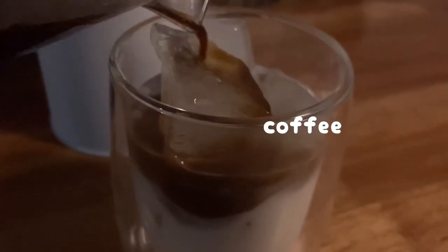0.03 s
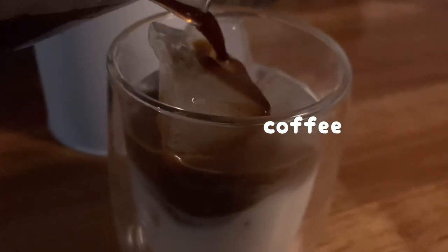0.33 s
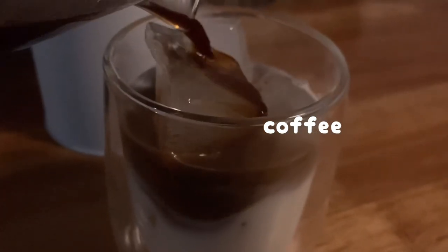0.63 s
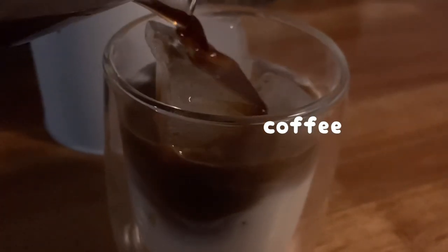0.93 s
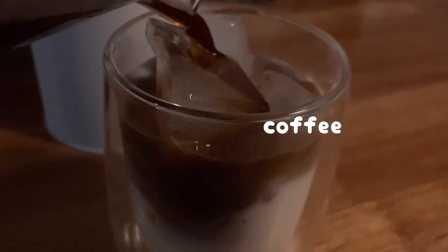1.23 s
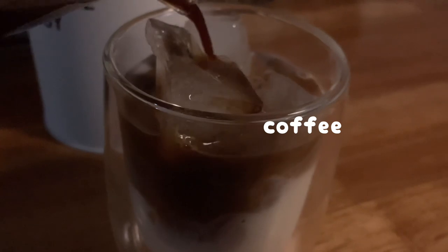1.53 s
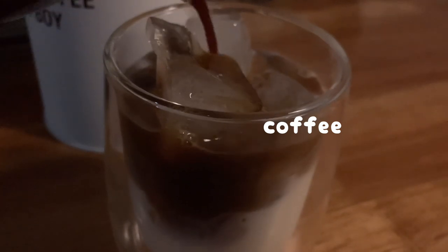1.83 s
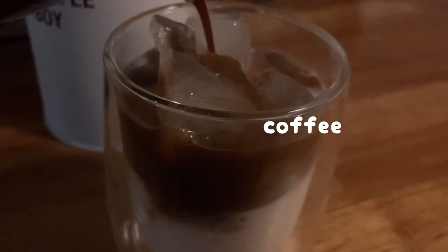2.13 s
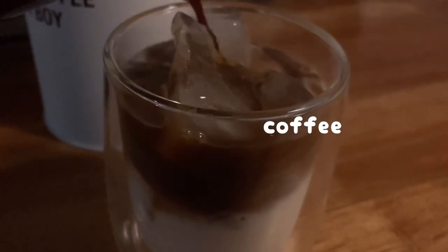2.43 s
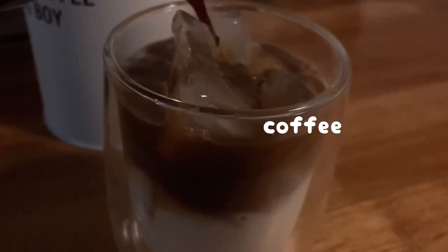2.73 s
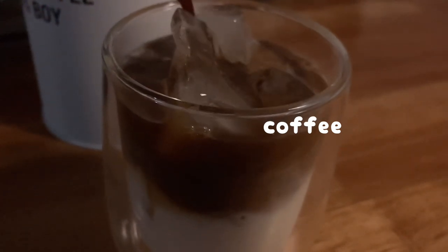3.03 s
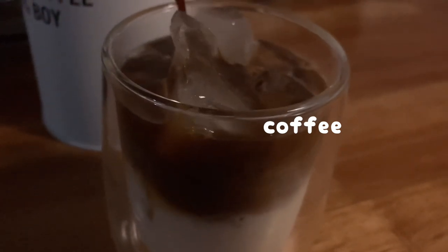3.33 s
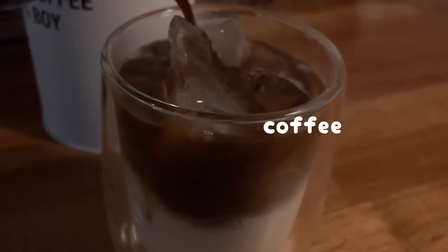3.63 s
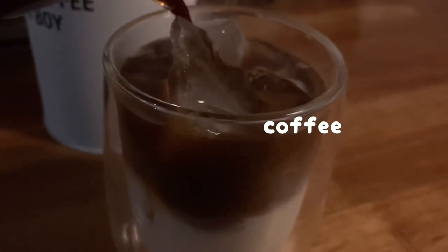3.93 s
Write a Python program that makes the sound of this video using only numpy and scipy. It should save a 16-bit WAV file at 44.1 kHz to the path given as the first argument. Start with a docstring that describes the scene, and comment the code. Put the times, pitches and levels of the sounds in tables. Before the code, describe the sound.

Ice cubes crackle softly and knock against a glass under a faint trickle of coffee.

```python
"""Ice ticks and crackles in a glass as a thin stream of coffee trickles over it, close to a stereo mic.
The warmed ice cracks and rings the glass; small bubbles burst as short rising pings.
Now and then a cube slips, knocks the glass and grinds on; once the big cube settles with a low ring.
Behind it an appliance hums in a small, quiet room."""
import sys
import numpy as np
from scipy import signal
from scipy.fft import rfft, irfft, next_fast_len
from scipy.io import wavfile
from scipy.ndimage import map_coordinates

SR = 44100
rng = np.random.default_rng(int(sys.argv[2]) if len(sys.argv) > 2 else 0)


def transcribe(u):
    """Save the signal u as a 16-bit wav file named by the first command-line argument.

    u: samples, shape (n,) or (channels, n), limited to [-1, 1]; the rate is SR.
    q: integer samples, one column per channel.
    """
    v = np.clip(np.atleast_2d(u).T, -1, 1)
    q = np.round(v * 32767).astype(np.int16)
    wavfile.write(sys.argv[1], SR, q)


N = 176400
TOP_HZ, LEAD_S, GRAIN_SCATTER_DB = 16350, .002, 3.5

# Cracks in the ice. Each row: start in seconds, relative level in dB, centre in Hz, width in octaves.
ICE_CRACKS = [(0.0171, -68.5, 4340, 0.96), (0.0635, -67.5, 6610.0, 0.075), (0.2368, -69, 10040.0, 0.14),
              (0.2555, -67, 7200, 0.32), (.39, -68.5, 9850, 0.69), (0.4967, -61.5, 6800, 0.11),
              (0.5041, -66.5, 7550, 0.24), (0.6202, -65.5, 7100, 0.27), (0.6827, -67, 4830.0, 1),
              (0.7194, -68, 7360, 0.21), (0.7641, -57, 6170, 0.41), (0.7934, -67, 4200, 0.41),
              (0.8515, -64, 4450.0, 0.58), (0.8844, -62, 4700.0, 0.44), (0.8914, -54, 11190.0, 0.69),
              (0.9194, -62, 10900, 0.17), (0.9526, -61, 8900.0, 0.97), (1.0421, -53, 9270, 0.16),
              (1.0614, -64, 11210.0, 0.22), (1.0745, -63, 9600, 0.34), (1.099, -66, 9690.0, 0.31),
              (1.1181, -67, 10950.0, 0.16), (1.2271, -59.5, 9400, 0.2), (1.2376, -71, 13390.0, 0.21),
              (1.2447, -70, 14000, 0.1), (1.2767, -70, 13470.0, 0.11), (1.322, -75, 7000, 0.28),
              (1.3399, -73, 15000, 0.14), (1.3697, -73, 11840.0, 0.44), (1.5669, -68, 7060.0, 0.59),
              (1.581, -71, 7880.0, 0.28), (1.5965, -70, 7880.0, 0.11), (1.6787, -68, 8450.0, 0.26),
              (1.7057, -72, 9810.0, 0.36), (1.7144, -65, 8200, 0.18), (1.7264, -65, 10000, 0.21),
              (1.7477, -56, 9400, 0.2), (1.7583, -67, 9500, 0.17), (1.7821, -62, 11100, 0.18),
              (1.802, -77, 11500, .2), (1.8576, -70, 11390.0, 0.25), (1.9025, -53.5, 11960.0, 0.31),
              (2.0014, -62, 11500, 0.32), (2.109, -76, 8000, 0.13), (2.1209, -71, 8230.0, 0.15),
              (2.1435, -68, 9400, 0.26), (2.263, -67, 5980.0, 0.65), (2.2694, -61.5, 8300, 0.23),
              (2.2873, -70, 8320.0, 0.41), (2.4921, -53.5, 7740, 0.15), (2.5283, -61.5, 7400, 0.2),
              (2.5565, -67, 8730.0, 0.15), (2.5634, -63, 7870.0, 0.11), (2.6919, -63, 10800, 0.22),
              (2.7214, -65.5, 8900, 0.45), (2.8946, -60, 9810.0, 0.062), (2.98, -66, 10200.0, 0.29),
              (3.0209, -62, 11280.0, 0.14), (3.034, -70, 11000, .15), (3.062, -65, 11140.0, 0.17),
              (3.0714, -68, 11260.0, 0.083), (3.0765, -59, 12000, 0.2), (3.155, -68, 9600, .35),
              (3.1896, -60, 11000, 0.21), (3.2, -71, 10900, .15), (3.257, -67, 7700, 0.18),
              (3.2772, -61.5, 9400, 0.48), (3.4794, -56, 11300, 0.36), (3.4929, -71, 10000, 0.16),
              (3.631, -69, 6500, 0.45), (3.724, -86, 13500, .2), (3.7693, -67, 6700, 0.23),
              (3.8835, -61.5, 8950, 0.53), (3.9417, -36.5, 15500, 0.51)]
# Cubes hitting the glass. Each row: start in seconds, relative level in dB, centre in Hz, width in octaves.
CUBE_KNOCKS = [(1.5158, -40.5, 4240, 2.7), (2.1944, -37.5, 1660, .36), (2.1946, -40, 4600, 0.75),
               (2.1972, -42, 3400, 0.93), (2.2016, -44.5, 3800, 1.1), (3.344, -45.5, 1880, 0.69),
               (3.371, -60.5, 4400, .74)]
# Left-right likeness of the ice sounds. Each row: frequency in Hz, coherence.
ICE_COHERENCE = [(1000, .88), (5500, .6), (7000, .99), (16000, .98)]


def amp(db):
    """Decibels to gain."""
    return 10 ** (np.asarray(db) / 20)


def unit_rms(x):
    """Scale to rms 1."""
    return x / np.sqrt(np.mean(x ** 2) + 1e-30)


def burst(x, db, window_s=.002):
    """Scale a short sound to the energy of db held for window_s."""
    return x / (np.linalg.norm(x) + 1e-20) * amp(db) * np.sqrt(window_s * SR)


def along(points, hz):
    """Interpolate (Hz, value) points on a log axis."""
    knots_hz, values = np.transpose(points)
    return np.interp(np.log(hz + 1), np.log(knots_hz + 1), values)


def envelope(points):
    """(s, dB) points to a gain per sample."""
    return amp(np.interp(np.arange(N) / SR, *np.transpose(points)))


def wobble(knots_per_s):
    """Smooth random curve."""
    return map_coordinates(rng.standard_normal(256), [np.arange(N) * knots_per_s / SR], mode="wrap")


def clock(samples):
    """Seconds since a contact, zero during the lead-in."""
    return np.maximum(np.arange(samples) / SR - LEAD_S, 0)


def filtered(x, response):
    """Apply the frequency response response(hz)."""
    n = x.shape[-1]
    padded = next_fast_len(n + 2048)
    return irfft(rfft(x, padded) * response(np.fft.rfftfreq(padded, 1 / SR)), padded)[..., :n]


def band(x, centre_hz, octaves):
    """Bell-shaped band-pass."""
    return filtered(x, lambda hz: np.exp(-(np.log2((hz + 1) / centre_hz) / octaves) ** 2 / 4))


def add(track, start_s, x):
    """Mix x into track."""
    first = max(round(start_s * SR), 0)
    part = track[..., first:first + x.shape[-1]]
    part += x[..., :part.shape[-1]]


def stereo(pair, coherence):
    """Mix two unrelated signals to left and right with the given coherence."""
    def weights(hz):
        angle = np.arccos(np.clip(along(coherence, hz), -1, 1)) / 2
        return np.array([np.cos(angle), np.sin(angle)])
    mid, side = filtered(pair, weights)
    return np.array([mid + side, mid - side])


def noise(spectrum, coherence):
    """Shaped stereo noise, rms 1."""
    pair = filtered(rng.standard_normal((2, N)), lambda hz: amp(along(spectrum, hz)))
    return unit_rms(stereo(pair, coherence))


def grains(per_s, centre_hz, spread_oct):
    """Random events. Each row: start in seconds, level in dB, pitch in Hz."""
    start_s = np.cumsum(rng.exponential(size=2000)) / per_s
    db = GRAIN_SCATTER_DB * np.minimum(rng.standard_normal(2000), 2)
    hz = centre_hz * 2 ** (spread_oct * rng.standard_normal(2000))
    return np.column_stack([start_s, db, hz])[start_s < N / SR]


def appliance_hum(waver_db=1.5, drift_rad=.1):
    """Steady tones, each wavering slightly in level and phase."""
    # Each row: frequency in Hz, rms level in dB.
    tones = [(96.9, -62), (166.9, -56), (209.9, -51), (502, -68.5), (1039, -88.5), (1276, -79),
             (1583, -84.5)]
    out, t = np.zeros(N), np.arange(N) / SR
    for hz, db in tones:
        waver = amp(waver_db * wobble(4.32))
        phase = 2 * np.pi * hz * t + drift_rad * wobble(3.005)
        out += amp(db) * unit_rms(waver * np.sin(phase))
    return out


def room_rumble(level_db=-48, ripple_db=2.5, spacing_hz=21.97):
    """Low noise; room resonances ripple its spectrum above 300 Hz."""
    # Each row: frequency in Hz, relative density in dB.
    spectrum = [(20, -47), (35, -30), (55, -10.5), (80, -7), (108, -4.5), (130, 0.5), (190, -3), (232, 1),
                (280, -8.5), (350, -10.5), (440, -9.5), (560, -15.5), (670, -15.5), (830, -25.5),
                (1100, -23), (1550, -23.5), (2000, -30.5), (2400, -37.5), (2900, -40.5), (3700, -52),
                (6000, -57), (20000, -90)]
    # Each row: frequency in Hz, left-right coherence.
    coherence = [(60, 0.63), (150, 1), (300, 0.97), (550, 0.71), (900, 0.075), (1400, 0.59), (2200, 0.04),
                 (4000, 0.066)]
    knots = rng.standard_normal(2048)

    def ripple(hz):
        depth_db = ripple_db * np.clip(hz / 300 - 1, 0, 1)
        return amp(depth_db * np.interp(hz / spacing_hz, np.arange(len(knots)), knots))
    return amp(level_db) * filtered(noise(spectrum, coherence), ripple)


def hiss(rms_db=-85.5):
    """Faint, steady high noise."""
    # Each row: frequency in Hz, relative density in dB.
    spectrum = [(1000, -41), (4000, 3), (5600, -3.5), (6600, 0.5), (8500, 0.5), (9700, 4.5), (11500, 3),
                (14000, -2.5), (16000, -1)]
    # Each row: frequency in Hz, left-right coherence.
    coherence = [(4000, .23), (6000, .5), (7000, .98), (14000, .98)]
    return amp(rms_db) * noise(spectrum, coherence)


def pings(rows, t60_cycles=50, pitch_rise=.05):
    """Each bubble rings as a damped, slightly rising sine, centred in the image."""
    out, t = np.zeros((2, N)), np.arange(1024) / SR
    for start_s, db, hz in rows:
        age = t * hz / t60_cycles
        tone = np.sin(2 * np.pi * hz * t * (1 + pitch_rise * age / 2))
        add(out, start_s, burst(tone * amp(-60 * age) * (1 - np.exp(-10 * age)), db))
    return out


def trickle():
    """Tiny bubbles where the stream runs off the ice."""
    # Each row: time in seconds, rms level in dB.
    levels = [(0, -95), (.22, -98), (.28, -85.5), (.55, -88), (.68, -86.5), (.9, -88), (1.1, -96),
              (1.45, -88), (1.8, -98), (2.4, -99), (3.95, -98)]
    return envelope(levels) * unit_rms(pings(grains(per_s=450, centre_hz=3950, spread_oct=.15)))


def snap(t, rise_s, t60_s):
    """Two unrelated, fast-decaying noise bursts."""
    return rng.standard_normal((2, len(t))) * amp(-60 * t / t60_s) * (1 - np.exp(-t / rise_s))


def ticks(rows):
    """Tiny soft cracks: narrow-band snaps."""
    out, t = np.zeros((2, N)), clock(600)
    for start_s, db, hz in rows:
        tick = band(snap(t, rise_s=.002, t60_s=.01), min(hz, TOP_HZ), octaves=.09)
        add(out, start_s, burst(tick, db))
    return stereo(out, ICE_COHERENCE)


def crackle(flurry_db=3.5):
    """Wetted ice crackles finely, in flurries."""
    # Each row: time in seconds, rms level in dB.
    levels = [(0, -95), (.4, -91), (.7, -89), (1.0, -88), (1.25, -86), (1.48, -89), (1.75, -81), (1.9, -97),
              (2.12, -85), (2.26, -82), (2.35, -97), (2.58, -90), (2.8, -96), (3.07, -85.5), (3.35, -94),
              (3.8, -93), (3.95, -89)]
    flurries = amp(flurry_db * wobble(28))
    spray = ticks(grains(per_s=420, centre_hz=10000, spread_oct=.36))
    return envelope(levels) * unit_rms(flurries * spray)


def contacts(rows, rise_s, snap_t60_s, snap_db=8.5):
    """Each event snaps and rings the glass within its own band."""
    # Modes of glass and ice. Each row: frequency in Hz, relative level in dB, t60 in seconds.
    modes = [(860, -4, .05), (1190, -2, 0.013), (1615, 8, 0.008), (1790, 11, 0.0046), (2900, -7, 0.024),
             (3400, -3, 0.013), (4310, 5, 0.01), (5080, -1.5, .012), (6100, -8, 0.015), (7770, -0.5, 0.011),
             (9850, 6.5, 0.0076), (10890, -6, 0.021), (12370, 1, 0.0084), (14100, -2, 0.013),
             (15000, -8, .008)]
    mode_hz, mode_db, t60_s = np.transpose(modes)[:, :, None]
    out, t = np.zeros((2, N)), clock(2048)
    for start_s, db, centre_hz, octaves in rows:
        strength = amp(mode_db + 2 * rng.standard_normal((2, len(modes), 1)))
        phase = 2 * np.pi * rng.random((2, len(modes), 1))
        ring = (strength * amp(-60 * t / t60_s) * np.sin(2 * np.pi * mode_hz * t + phase)).sum(1)
        ring *= 1 - np.exp(-t / rise_s)
        hit = band(ring + amp(snap_db) * snap(t, rise_s, snap_t60_s), centre_hz, octaves)
        add(out, start_s - LEAD_S, np.array([burst(channel, db) for channel in hit]))
    return stereo(out, ICE_COHERENCE)


def cracks(gain_db=-2.5):
    """Warmed ice cracks sharply."""
    return amp(gain_db) * contacts(ICE_CRACKS, rise_s=.0005, snap_t60_s=.01)


def splinters(per_crack=4, level_db=-77.5, scatter_s=.011, spread_oct=.24):
    """Faint ticks near each crack in time and pitch."""
    crack_s, _, crack_hz, _ = np.repeat(ICE_CRACKS, per_crack, axis=0).T
    when, size, pitch = rng.standard_normal((len(crack_s), 3)).T
    db = level_db + GRAIN_SCATTER_DB * size
    return ticks(zip(crack_s + scatter_s * when, db, crack_hz * 2 ** (spread_oct * pitch)))


def bubbles():
    """Single bubbles burst under the stream."""
    # Each row: start in seconds, level in dB, pitch in Hz.
    pops = [(.1329, -68, 3480), (.3036, -69.5, 3870), (.4438, -66, 4130), (.5776, -65.5, 3540),
            (.6679, -65.5, 3950)]
    return pings(pops)


def sizzle():
    """A spell of very high pops as the stream runs over fresh ice."""
    # Each row: time in seconds, rms level in dB.
    levels = [(.98, -115), (1.09, -83), (1.19, -78), (1.24, -86), (1.3, -87), (1.48, -81), (1.64, -115)]
    return envelope(levels) * unit_rms(ticks(grains(per_s=260, centre_hz=13800, spread_oct=.15)))


def knocks(gain_db=-.5, cutoff_hz=13200):
    """Slipping cubes hit the glass; wet ice dulls the top."""
    hits = amp(gain_db) * contacts(CUBE_KNOCKS, rise_s=.00015, snap_t60_s=.006)
    return filtered(hits, lambda hz: 1 / (1 + (hz / cutoff_hz) ** 6))


def crunch(per_knock=20, below_db=21, length_s=.07, fade_db=24, low_hz=2410, high_hz=8200):
    """Cubes grind on after each knock: a fading spray of ticks."""
    knock_s, knock_db, _, _ = np.repeat(CUBE_KNOCKS, per_knock, axis=0).T
    when, pitch, size = rng.random((len(knock_s), 3)).T
    db = knock_db - below_db - fade_db * when + GRAIN_SCATTER_DB * (2 * size - 1)
    return ticks(zip(knock_s + length_s * when, db, low_hz + (high_hz - low_hz) * pitch))


def settle(start_s=2.2012, ring_db=-35.5, ring_hz=324, ring_t60_s=.2, thud_t60_s=.05):
    """The big cube lands with a thud and the filled glass rings low."""
    out, t = np.zeros(N), np.arange(SR // 2) / SR
    ring = amp(ring_db - 60 * t / ring_t60_s) * np.sin(2 * np.pi * ring_hz * t)
    thud = band(rng.standard_normal(len(t)) * amp(-60 * t / thud_t60_s), centre_hz=750, octaves=.26)
    add(out, start_s, ring + burst(thud, db=-55))
    return out


def room_tail(x):
    """Short, diffuse stereo reverberation."""
    # Each row: frequency in Hz, t60 in seconds.
    decay = [(300, 0.055), (2000, 0.32), (6000, 0.21), (15000, 0.11)]
    # Each row: frequency in Hz, left-right coherence.
    coherence = [(200, .71), (900, .22), (5500, .2), (7000, .95), (16000, .95)]
    hz, t, spectra = signal.stft(rng.standard_normal((2, SR // 2)), SR, nperseg=256)
    spectra *= amp(-60 * t / along(decay, hz)[:, None])
    impulse = stereo(signal.istft(spectra, SR, nperseg=256)[1], coherence)
    return signal.fftconvolve(x.mean(0)[None], impulse / np.linalg.norm(impulse[0]), axes=1)[:, :N]


def off_centre(x):
    """Sound from the side reaches the two capsules with different phase."""
    # Each row: frequency in Hz, phase lead of the left channel in radians.
    phase_lead = [(0, 0), (100, -.36), (300, -.36), (600, -.5), (1500, -1.8), (2600, -2.9), (3600, -4.2),
                  (5500, -3.8), (6700, -6.2), (7100, -6.4), (15700, -18.8), (17000, -18.9)]
    lead_rad = lambda hz: np.interp(hz, *np.transpose(phase_lead))
    return filtered(x, lambda hz: np.exp(.5j * np.array([lead_rad(hz), -lead_rad(hz)])))


def scene(knock_send_db=-12, close_send_db=-15, crackle_send_db=-3.5, balance_db=.17):
    """Close, dry ice and centred coffee over a more diffuse crackle and the background."""
    background = appliance_hum() + room_rumble() + hiss()
    cubes = knocks()
    ice = cracks() + splinters() + sizzle() + crunch()
    bed = crackle()
    coffee = bubbles() + trickle()
    tail = amp(knock_send_db) * room_tail(cubes)
    tail += room_tail(amp(close_send_db) * (ice + coffee) + amp(crackle_send_db) * bed)
    mix = off_centre(background + cubes + settle() + ice + bed + tail) + coffee
    return mix * amp([[balance_db], [-balance_db]])


def record(dry):
    """Steep low-pass at TOP_HZ."""
    return filtered(dry, lambda hz: 1 / (1 + (hz / TOP_HZ) ** 120))


dry = scene()
out = record(dry)
transcribe(out)
```